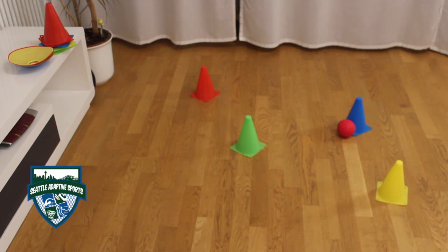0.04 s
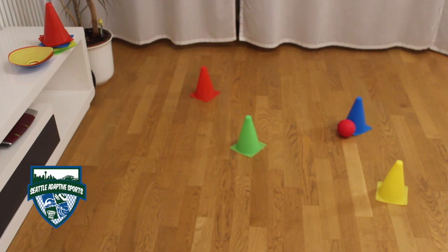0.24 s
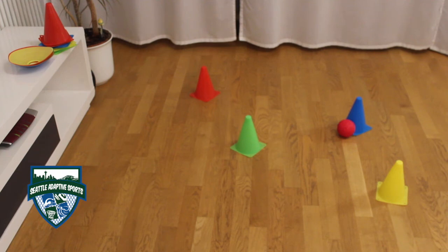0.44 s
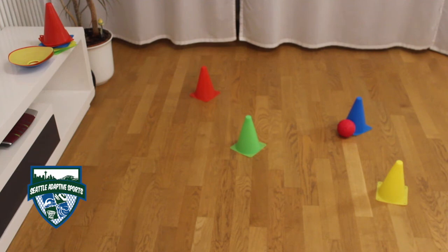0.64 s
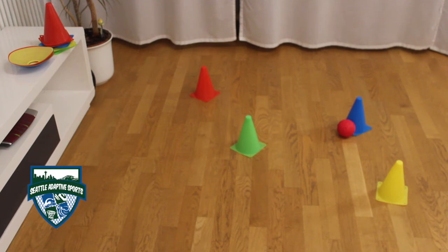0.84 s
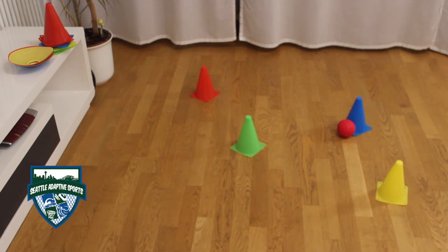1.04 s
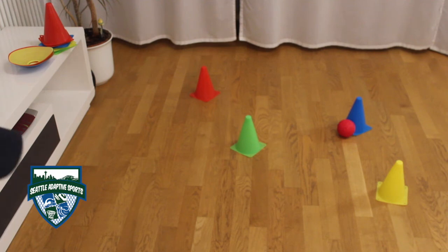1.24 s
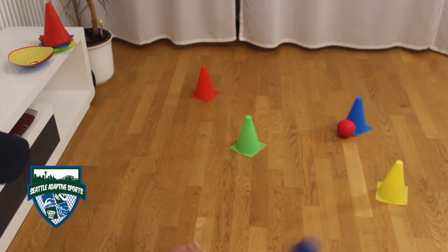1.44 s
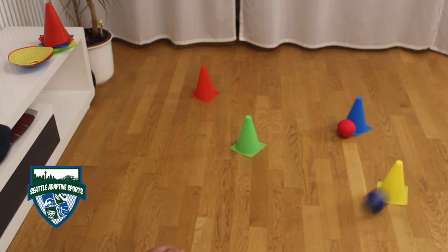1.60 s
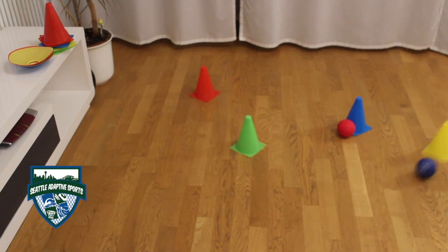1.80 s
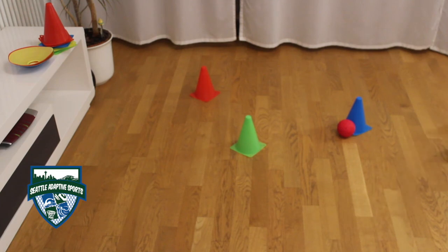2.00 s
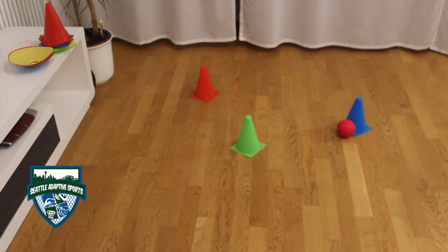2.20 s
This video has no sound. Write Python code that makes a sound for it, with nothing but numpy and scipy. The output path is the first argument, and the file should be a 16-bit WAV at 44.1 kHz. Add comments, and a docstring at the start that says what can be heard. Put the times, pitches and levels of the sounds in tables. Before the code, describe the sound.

Thrown ball hits wooden boards, then cracks into a small hollow plastic cone that clatters off

```python
"""A hard ball is thrown along a wooden floor in a living room, after a sharp click and a soft bump nearby.
It lands with a slap (coloured noise bursts), scuffs the boards (a swell of noise) and knocks a small hollow
plastic cone, which booms and clacks (decaying modes and noise bursts). The cone skids away with clatter, hiss
and small squeaks (wavering tones) while the ball rolls on (two wavering resonances over a rumble).
A faint hum lies under the room's hiss, with a dull rustle of the throw."""
import sys
import numpy as np
from scipy import signal
from scipy.fft import rfft, irfft, next_fast_len
from scipy.io import wavfile

SR = 44100
rng = np.random.default_rng(int(sys.argv[2]) if len(sys.argv) > 2 else 0)


def to_wav(s):
    """Save 16-bit WAV."""
    ch = np.atleast_2d(s).T  # columns
    pcm = np.round(np.clip(ch, -1, 1) * 32767)  # PCM
    wavfile.write(sys.argv[1], SR, pcm.astype(np.int16))


N = 99357
TIME = np.arange(N) / SR  # seconds


def from_db(db):
    """Decibels to gain."""
    return 10 ** (np.asarray(db) / 20)


def rms_one(x):
    """Scale to rms 1."""
    return x / np.sqrt(np.mean(x ** 2) + 1e-20)


def noise():
    """White noise for the whole scene."""
    return rng.standard_normal(N)


def swell(centre_s, width_s):
    """A bell-shaped rise and fall; the width is its standard deviation."""
    return np.exp(-((TIME - centre_s) / width_s) ** 2 / 2)


def at_hz(points, hz):
    """Read a table on a log-frequency axis."""
    known_hz, values = np.transpose(points)
    return np.interp(np.log(np.maximum(hz, 1)), np.log(known_hz), values)


def gains(rows):
    """One gain curve for each dB column of a time table, silent before it starts."""
    s, *columns = np.transpose(rows)
    return [from_db(np.interp(TIME, s, column)) * (TIME >= s[0]) for column in columns]


def colour(x, points):
    """Causal (minimum-phase) filter that follows a spectrum."""
    size = 2 * next_fast_len(N)
    hz = np.arange(size // 2 + 1) * SR / size
    cepstrum = irfft(np.log(from_db(at_hz(points, hz))))
    # folding the cepstrum onto positive time gives minimum phase
    cepstrum[1:size // 2] *= 2
    cepstrum[size // 2 + 1:] = 0
    return irfft(rfft(x, size) * np.exp(rfft(cepstrum)))[:N]


def soften(x, hz):
    """Second-order low-pass: takes the edge off a contact or smooths noise."""
    return signal.sosfilt(signal.butter(2, hz, fs=SR, output="sos"), x + 1e-18)


def clicks(s, db):
    """Single impulses at given times and levels."""
    samples = (np.asarray(s) * SR).astype(int)
    return np.bincount(samples, from_db(db), N)[:N]


def bursts(s, db, t60):
    """Each contact is a dying burst of noise whose energy is set by its level."""
    keep = np.exp(-2 * np.log(1000) / (t60 * SR))  # power kept per sample
    power = signal.lfilter([1 - keep], [1, -keep], clicks(s, db) ** 2 + 1e-18)
    return np.sqrt(power) * noise()


def blows(rows, spectrum, ring_s):
    """Contacts on a well-damped body: coloured noise bursts."""
    return colour(bursts(*np.transpose(rows), ring_s), spectrum)


def ring(force, modes):
    """Decaying modes, all driven by one force."""
    out = 0
    for hz, db, t60 in modes:
        radius = np.exp(-np.log(1000) / (t60 * SR))
        angle = 2 * np.pi * hz / SR
        feedback = [1, -2 * radius * np.cos(angle), radius * radius]
        out = out + signal.lfilter([0, from_db(db) * np.sin(angle)], feedback, force + 1e-18)
    return out


def wander(hz):
    """Low-passed chance with rms 1; the filter settles for a second first."""
    return rms_one(soften(rng.standard_normal(N + SR), hz)[SR:])


def wavering(hz, waver, waver_hz, rough):
    """A resonance kept going by friction: its pitch and strength waver; rms 1."""
    phase = 2 * np.pi * np.cumsum(hz * (1 + waver * wander(waver_hz))) / SR
    return rms_one(np.sin(phase) * (1 + rough * wander(waver_hz)))


# The ball slaps onto the boards. Each row: start in seconds, burst level in dB before colouring.
LANDING_HITS = [(1.4786, -8), (1.488, -10.5), (1.518, -12)]
# Tone of the slap. Each row: frequency in Hz, gain in dB.
LANDING_SPECTRUM = [(30, 11), (55, 12), (85, -6), (180, 15), (400, 23), (800, 12.5), (1500, 6.5),
                    (3000, 8.5), (7000, -1.5), (15000, -6.5)]
LANDING_RING_S, LANDING_ROOM_DB = 0.089, -4.5


def ball_landing():
    """The hard ball strikes the damped boards, and each contact dies as a noise burst."""
    return blows(LANDING_HITS, LANDING_SPECTRUM, LANDING_RING_S)


# Tone of the scuff. Each row: frequency in Hz, gain in dB.
SCUFF_SPECTRUM = [(100, 3.5), (500, -3.5), (1100, -1.5), (1800, 0), (2400, 0), (4200, -3), (7000, -12.5),
                  (15000, -19)]
SCUFF_S, SCUFF_RISE_S, SCUFF_FALL_S = 1.626, 0.02, 0.01  # peak time, widths of rise and fall
SCUFF_DB, SCUFF_ROOM_DB = -37, -2.5


def ball_scuff():
    """A short swell of friction noise as the ball grazes the boards."""
    width_s = np.where(TIME < SCUFF_S, SCUFF_RISE_S, SCUFF_FALL_S)
    friction = rms_one(colour(noise(), SCUFF_SPECTRUM))
    return from_db(SCUFF_DB) * swell(SCUFF_S, width_s) * friction


# The hollow shell's modes. Each row: frequency in Hz, level in dB, decay time t60 in seconds.
CONE_MODES = [(207, -38, 0.1), (272.3, -17.5, 0.13), (284, -15, 0.15), (336.2, -22, 0.43),
              (399.4, -17.5, 0.12), (536, -27.5, 0.17), (590, -17, 0.052), (656, -31, 0.042),
              (763, -28, 0.038), (1100, -43, 0.09), (1570, -51, .06), (1810, -22, 0.05), (1935, -20, 0.054)]
SHELL_LOW_HZ = 162


def shell(force):
    """The cone's ring, without the deep bass that it is too small to radiate."""
    high_pass = signal.butter(2, SHELL_LOW_HZ, "high", fs=SR, output="sos")
    return signal.sosfilt(high_pass, ring(force, CONE_MODES))


# Knocks on the cone.
# Each row: start in seconds, dull push in dB before the PUSH_DB trim, hard crack in dB before colouring.
CONE_KNOCKS = [(1.676, -10, -5), (1.6826, -9, -5.5), (1.688, -15, -0.5), (1.695, -4.5, -1.5),
               (1.7050, 1.5, -3.5), (1.7088, 0, -4.5), (1.7129, 0, -7), (1.7266, -13, -6),
               (1.7445, -14, -9.5), (1.7798, -28, -9), (1.799, -11, -12), (1.821, -12, -26),
               (1.863, -10.5, -17), (1.914, -13, -25), (2.074, -21.5, -33)]
# Tone of the hard crack. Each row: frequency in Hz, gain in dB.
CRACK_SPECTRUM = [(30, -22), (75, -18), (130, 10), (400, 26), (700, 14.5), (1200, 8.5), (1800, 14.5),
                  (2300, 6), (3000, 1), (5000, -1), (8000, -5), (15000, -10)]
PUSH_HZ, PUSH_DB = 504, -3  # low-pass and trim of the push
CRACK_S, CRACK_MODES_DB = 0.062, -12  # decay time, and how much crack drives the shell
CONE_ROOM_DB = -8


def cone_knocks():
    """Each knock pushes the shell into a hollow boom and cracks against its hard wall."""
    s, push_db, crack_db = np.transpose(CONE_KNOCKS)
    push = soften(clicks(s, push_db + PUSH_DB), PUSH_HZ)
    crack = bursts(s, crack_db, CRACK_S)
    boom = shell(push + from_db(CRACK_MODES_DB) * crack)
    return boom + colour(crack, CRACK_SPECTRUM)


# The cone skids away. Each row: time in seconds, clatter level in dB, scraping hiss level in dB.
SKID_LEVELS = [(1.68, -45, -52), (1.73, -35, -44.5), (1.81, -38.5, -45.5), (1.90, -41.5, -47),
               (1.94, -40.5, -43), (1.98, -34, -52), (2.04, -40, -53), (2.099, -38, -60),
               (2.17, -47.5, -80), (2.25, -51, -74)]
# Tone of the clatter. Each row: frequency in Hz, gain in dB.
CLATTER_SPECTRUM = [(60, -57), (200, -19.5), (500, -3.5), (700, -12.5), (950, -8), (1250, -7), (1700, -1),
                    (1950, -0.5), (2250, -6.5), (2900, -5), (3500, -12), (4700, -14.5), (7000, -24),
                    (15000, -38.5)]
# Tone of the scrape. Each row: frequency in Hz, gain in dB.
SCRAPE_SPECTRUM = [(1000, -14), (3500, -2.5), (6000, -1.5), (9000, -8), (15000, -14)]
CHATTER_PER_S, CHATTER_JITTER = 130, 0.27  # typical rate, log spread of the gaps
CHATTER_SPREAD_DB, CHATTER_S = 3.5, 0.047  # spread of the levels, decay time
SKID_ROOM_DB = -1.5


def cone_skid():
    """The rim chatters finely over the floor and the plastic scrapes."""
    start_s = SKID_LEVELS[0][0]
    chance = rng.standard_normal(size=(300, 2))
    gaps_s = np.exp(CHATTER_JITTER * chance[:, 0]) / CHATTER_PER_S
    chatter = bursts(start_s + np.cumsum(gaps_s), CHATTER_SPREAD_DB * chance[:, 1], CHATTER_S)
    layers = colour(chatter, CLATTER_SPECTRUM), colour(noise(), SCRAPE_SPECTRUM)
    # each layer is evened out over the skid before its level curve
    return sum(gain * x / np.std(x[TIME > start_s]) for gain, x in zip(gains(SKID_LEVELS), layers))


# The rim catches and squeaks.
# Each row: centre in seconds, half length in seconds, pitch in Hz, level in dB.
RIM_SQUEAKS = [(1.857, 0.0089, 2584, -40), (1.859, 0.013, 1770, -39.5), (1.97, 0.011, 1359, -41.5),
               (1.976, 0.0065, 4490, -43), (1.986, 0.013, 2840, -44), (2.002, 0.025, 1780, -39),
               (2.051, 0.0033, 2847, -37), (2.092, 0.0058, 2836, -34), (2.105, 0.038, 1640, -46),
               (2.115, 0.1, 1152, -53.5), (2.178, 0.016, 1880, -48.5)]
SQUEAK_WAVER, SQUEAK_WAVER_HZ = 0.045, 220  # pitch spread as a fraction, low-pass of the wavering
SQUEAK_ROUGH, SQUEAK_ROOM_DB = 0.55, -2.5  # strength spread as a fraction, room level


def cone_squeaks():
    """Each catch of the rim swells into a short, rough tone."""
    out = 0
    for s, half_length_s, hz, db in RIM_SQUEAKS:
        tone = wavering(hz, SQUEAK_WAVER, SQUEAK_WAVER_HZ, SQUEAK_ROUGH)
        out = out + from_db(db) * swell(s, half_length_s) * tone
    return out


# The ball rolls on. Each row: time in seconds, level of the lower resonance in dB, of the upper in dB.
ROLL_LEVELS = [(1.70, -34, -43), (1.80, -38.5, -32), (1.90, -41, -38.5), (1.97, -43, -35.5),
               (2.02, -34.5, -47), (2.06, -35, -35), (2.11, -47, -32.5), (2.16, -48, -39.5),
               (2.21, -42, -47), (2.25, -42, -46)]
# The two resonances of the boards, lower then upper: frequency in Hz.
BOARD_HZ = [208, 282]
# Tone of the broad rumble beneath them. Each row: frequency in Hz, gain in dB.
RUMBLE_SPECTRUM = [(30, -31), (80, -51), (130, -4.5), (185, 4), (260, -1.5), (320, 5), (390, -1), (470, -2),
                   (560, -15.5), (750, -17.5), (2000, -35)]
ROLL_WAVER, ROLL_WAVER_HZ = 0.0306, 48  # pitch spread as a fraction, low-pass of the wavering
ROLL_ROUGH, ROLL_ROOM_DB = 0.44, -20  # strength spread as a fraction, room level
RUMBLE_DB = -6.5  # against the two resonances' summed gains


def ball_roll():
    """The boom shifts between two resonances of the boards, over a rumble that follows both."""
    levels = gains(ROLL_LEVELS)
    boom = sum(gain * wavering(hz, ROLL_WAVER, ROLL_WAVER_HZ, ROLL_ROUGH)
               for gain, hz in zip(levels, BOARD_HZ))
    rumble = rms_one(colour(noise(), RUMBLE_SPECTRUM))
    return boom + from_db(RUMBLE_DB) * sum(levels) * rumble


# Three contacts in quick succession. Each row: start in seconds, level in dB before colouring.
CLICK_CONTACTS = [(0.1820, 0.5), (0.1838, -2.5), (0.1854, -5.5)]
# Tone of the dry snap. Each row: frequency in Hz, gain in dB.
CLICK_SPECTRUM = [(100, -16), (300, 4), (600, 7), (900, -22), (2500, 0.5), (5300, -4), (7500, -9.5),
                  (15000, -8.5)]
# The click's brief ring. Each row: frequency in Hz, level in dB, decay time t60 in seconds.
CLICK_RING_MODES = [(320, -42, 0.048), (630, -21, 0.024), (1270, -30.5, 0.028), (1990, -25, 0.024),
                    (2510, -27.5, 0.032), (3400, -38.5, 0.018), (3960, -24.5, 0.019), (4900, -28.5, 0.02),
                    (5530, -32, 0.028), (6370, -36, 0.023)]
# Tone of the click as it spreads into the room. Each row: frequency in Hz, gain in dB.
CLICK_TAIL_SPECTRUM = [(100, 2), (300, -5.5), (650, 4.5), (900, -2), (1300, 5), (1900, -3.5), (2600, 1),
                       (4000, -4.5), (5300, -3), (8000, -9.5), (15000, -13)]
CLICK_RING_S, CLICK_ROOM_DB = 0.0089, 2.5


def click():
    """A dry snap; its strongest contact rings briefly and sets off a dense room tail."""
    s, db = max(CLICK_CONTACTS, key=lambda row: row[1])
    strongest = clicks([s], [db])
    spread = colour(strongest, CLICK_TAIL_SPECTRUM)
    tail = from_db(CLICK_ROOM_DB) * signal.fftconvolve(spread, room_response())[:N]
    snap = blows(CLICK_CONTACTS, CLICK_SPECTRUM, CLICK_RING_S)
    return snap + ring(strongest, CLICK_RING_MODES) + tail


# Soft bumps on the floor. Each row: start in seconds, burst level in dB before colouring.
FLOOR_BUMPS = [(1.1828, -4.5), (1.196, -20.5), (1.255, -26)]
# Tone of the bumps. Each row: frequency in Hz, gain in dB.
BUMP_SPECTRUM = [(40, -10), (100, 13), (300, 15), (550, 8), (900, -10), (1900, -13), (3500, -24),
                 (15000, -35)]
BUMP_RING_S, BUMP_ROOM_DB = 0.022, 4.5


def floor_bumps():
    """Soft contacts on the damped floor: short, dull noise bursts."""
    return blows(FLOOR_BUMPS, BUMP_SPECTRUM, BUMP_RING_S)


# Faint, dull rustle of the wind-up and throw. Each row: time in seconds, level in dB.
RUSTLE_LEVELS = [(0.5, -70), (0.65, -57), (0.88, -57), (0.94, -52), (1.0, -59), (1.22, -55), (1.32, -51),
                 (1.45, -55), (1.6, -51), (1.7, -64)]
# Tone of the rustle. Each row: frequency in Hz, gain in dB.
RUSTLE_SPECTRUM = [(50, -8), (110, 9), (260, 11), (500, 3), (1200, -9), (4000, -18), (15000, -24)]


def throw_rustle():
    """Dull noise that follows a slowly moving level."""
    return gains(RUSTLE_LEVELS)[0] * rms_one(colour(noise(), RUSTLE_SPECTRUM))


# Steady tones. Each row: frequency in Hz, rms level in dB.
HUM_TONES = [(55.5, -56), (554.5, -58), (3558, -72)]


def hum():
    """Steady sines, each starting at a random phase."""
    return sum(np.sqrt(2) * from_db(db) * np.sin(2 * np.pi * (hz * TIME + rng.random()))
               for hz, db in HUM_TONES)


# Tone of the room's hiss. Each row: frequency in Hz, gain in dB.
AIR_SPECTRUM = [(30, -15), (90, -5), (130, 0), (260, -1), (450, -3), (750, -9), (1400, -12), (3000, -15),
                (6000, -19.5), (15000, -24)]
AIR_DB = -49  # rms


def room_hiss():
    """Steady coloured noise."""
    return from_db(AIR_DB) * rms_one(colour(noise(), AIR_SPECTRUM))


# How long the room rings. Each row: frequency in Hz, decay time t60 in seconds.
ROOM_DECAY = [(100, 0.32), (300, 0.38), (800, 0.39), (2500, .46), (6000, 0.38), (14000, 0.25)]
ROOM_DELAY_S = 0.004


def room_response():
    """Diffuse reflections of unit energy, each half octave dying at its own rate."""
    t = TIME[:N // 3]
    edges = np.geomspace(60, 17000, 17)
    white = rng.standard_normal((2, len(t)))  # neighbouring bands use different noise
    out = 0
    for k, (low, high) in enumerate(zip(edges, edges[1:])):
        band_pass = signal.butter(2, [low, high], "band", fs=SR, output="sos")
        band = signal.sosfilt(band_pass, white[k % 2])
        t60 = at_hz(ROOM_DECAY, np.sqrt(low * high))
        dying = rms_one(band * np.exp(-np.log(1000) * t / t60))
        out = out + dying * np.sqrt((high - low) * t60)
    return np.concatenate([np.zeros(int(ROOM_DELAY_S * SR)), out / np.linalg.norm(out)])


def scene():
    """Ball, cone and bumps share one room; the click has its own tail and the background stays direct."""
    sources = [(ball_landing(), LANDING_ROOM_DB), (ball_scuff(), SCUFF_ROOM_DB),
               (cone_knocks(), CONE_ROOM_DB), (cone_skid(), SKID_ROOM_DB),
               (cone_squeaks(), SQUEAK_ROOM_DB), (ball_roll(), ROLL_ROOM_DB),
               (floor_bumps(), BUMP_ROOM_DB)]
    direct = sum(x for x, db in sources)
    room_send = sum(from_db(db) * x for x, db in sources)
    reflected = signal.fftconvolve(room_send, room_response())[:N]
    background = throw_rustle() + hum() + room_hiss()
    return (direct + reflected + click() + background)[None]


CUTOFF_HZ = 15900


def record(dry):
    """A steep elliptic low-pass cuts the top."""
    return signal.sosfilt(signal.ellip(10, .2, 80, CUTOFF_HZ, fs=SR, output="sos"), dry)


dry = scene()
out = record(dry)
to_wav(out)
```